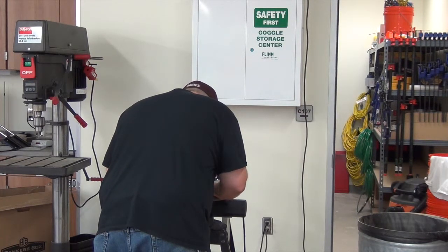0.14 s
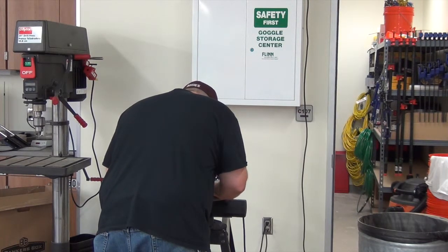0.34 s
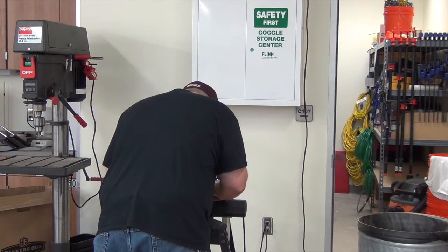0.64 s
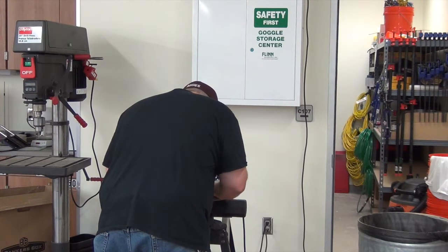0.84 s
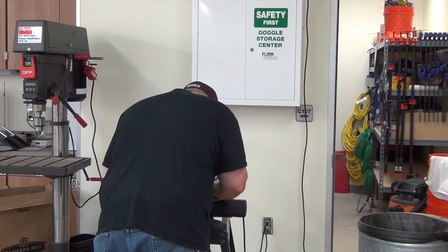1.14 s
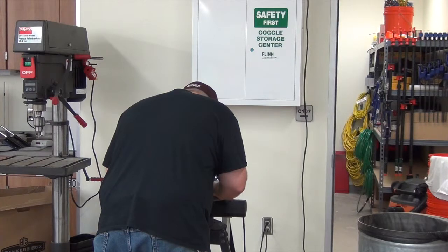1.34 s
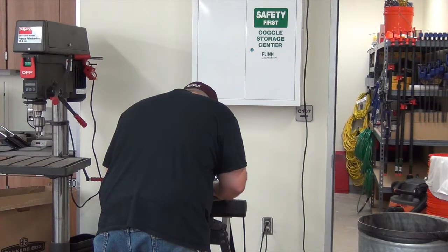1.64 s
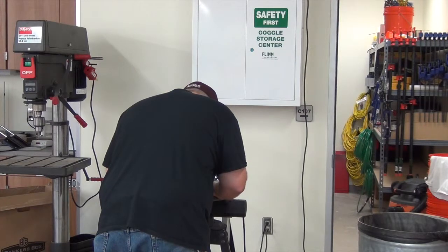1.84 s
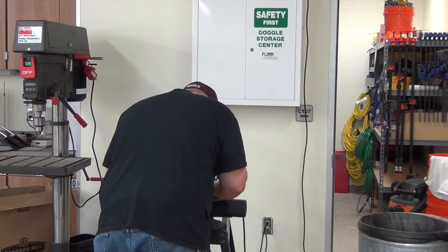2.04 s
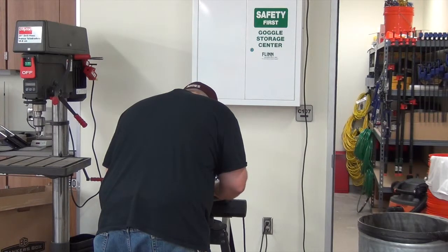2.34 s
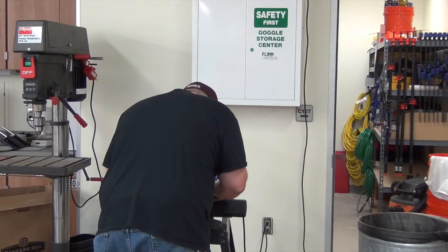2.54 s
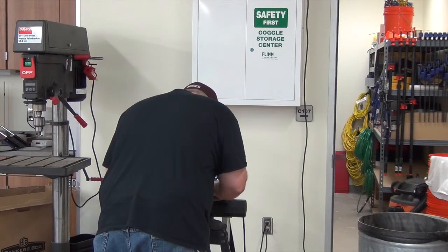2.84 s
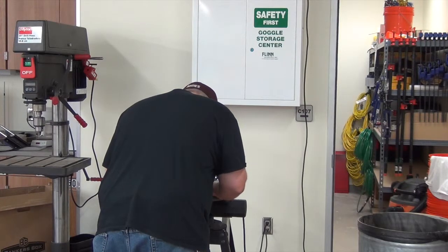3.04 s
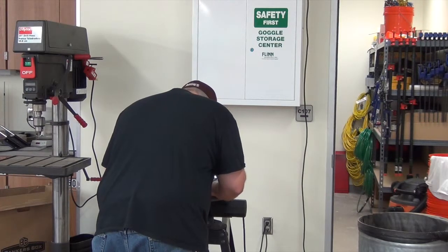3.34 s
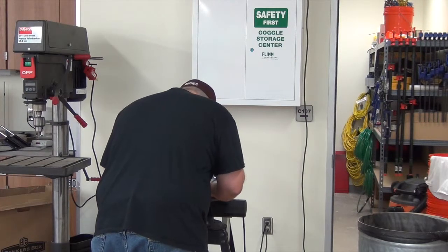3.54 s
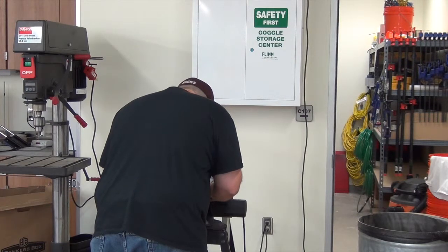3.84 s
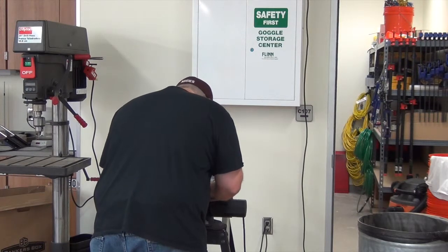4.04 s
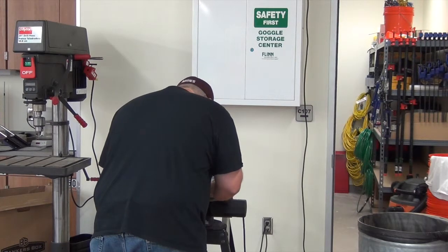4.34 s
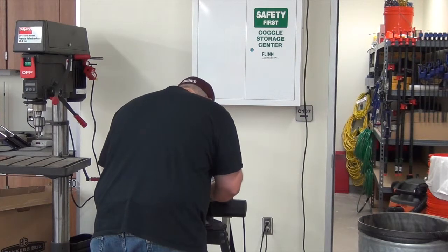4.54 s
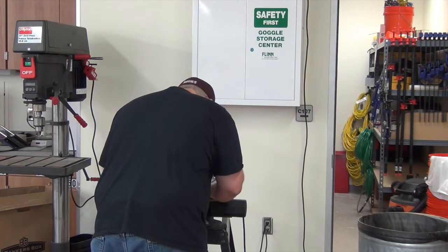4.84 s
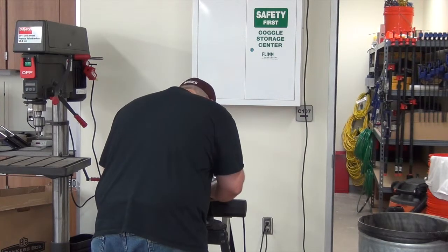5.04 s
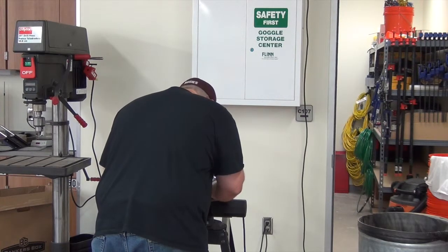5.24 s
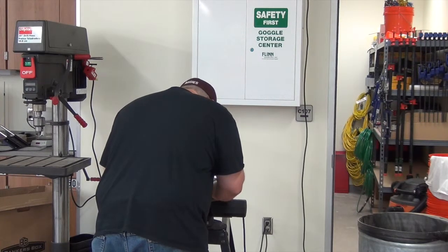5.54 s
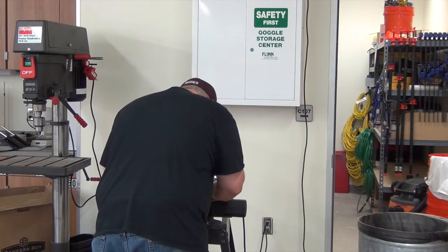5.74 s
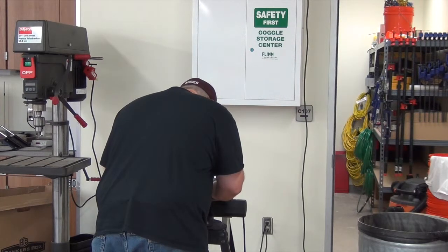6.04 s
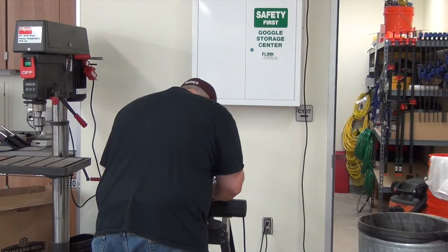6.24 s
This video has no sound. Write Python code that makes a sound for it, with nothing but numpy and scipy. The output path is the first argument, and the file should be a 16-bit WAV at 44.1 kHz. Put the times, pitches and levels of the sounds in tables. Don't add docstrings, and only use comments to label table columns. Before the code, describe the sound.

Rapid saw strokes, about twenty-four a second, tear at a wooden board with gritty rasping, high chirps and binding squeaks. The board slips and slaps the metal table in short, hollow bursts. Cutting softens, then stops, leaving steady motor hum and frame buzz. Finally the blade bites in again, rasping and shrieking louder. The room adds short, dense reflections; the nearly central stereo pickup is a few metres away, thin in deep bass and strained at the peaks.

```python
import sys
import numpy as np
from scipy import signal
from scipy.fft import rfft, irfft
from scipy.io import wavfile

SR = 44100
rng = np.random.default_rng(int(sys.argv[2]) if len(sys.argv) > 2 else 0)


def volts(x):
    e = np.asarray(x, float) / 20
    return 10 ** e


def output_pcm(signal):
    pcm = np.clip(np.atleast_2d(signal).T, -1, 1) * 32767
    wavfile.write(sys.argv[1], SR, np.round(pcm).astype(np.int16))


N = 281358
STROKE_HZ, MAINS_HUM_HZ = 24.15, 120


def rms_one(x):
    return x / np.sqrt(np.mean(x ** 2) + 1e-20)


def coloured(x, points):
    hz, db = np.transpose(points)
    bins = np.fft.rfftfreq(x.shape[-1], 1 / SR) + 1
    gain = volts(np.interp(np.log(bins), np.log(hz), db))
    return irfft(rfft(x) * gain, x.shape[-1])


def resonance(x, hz, width_hz):
    r = np.exp(-np.pi * max(width_hz, 4) / SR)
    top = (1 - r * r) / 2 * np.array([1, 0, -1])
    return signal.lfilter(top, [1, -2 * r * np.cos(2 * np.pi * hz / SR), r * r], x)


def band(x, low_hz, high_hz):
    return signal.sosfilt(signal.butter(4, [low_hz, high_hz], "band", fs=SR, output="sos"), x)


def drift(rate_hz):
    steps = rng.standard_normal(int(N / SR * 40) + 2)
    r = np.exp(-2 * np.pi * rate_hz / 40)
    slow = rms_one(signal.lfilter([1], [1, -r], steps))
    return np.interp(np.arange(N) / SR * 40, np.arange(len(slow)), slow)


def shop(x):
    t60_s, echo_db, side_db, wall_cut_hz = .35, -14, -29, 2500
    t = np.arange(int(.6 * SR)) / SR
    echoes = rng.standard_normal((2, len(t))) * volts(-60 * t / t60_s) * (t > .004)
    echoes[0] = signal.lfilter(*signal.butter(1, wall_cut_hz, fs=SR), echoes[0])
    echoes[1] = signal.lfilter(*signal.butter(1, 3 * wall_cut_hz, fs=SR), echoes[1])
    echoes /= np.sqrt(np.sum(echoes ** 2, axis=1, keepdims=True))
    mid, side = signal.fftconvolve(x[None], echoes, axes=1)[:, :N]
    mid = x + volts(echo_db) * mid
    return mid + volts(side_db) * side * [[1], [-1]]


# (time_s, lead_strokes)
CRANK_LEAD = [(0, -.17), (.5, -.17), (1.2, -.02), (2, -.07), (3, .02), (4.2, 0), (5.2, -.15), (6.38, -.08)]


def crank():
    t = np.arange(N) / SR
    return STROKE_HZ * t + np.interp(t, *np.transpose(CRANK_LEAD))


def bite(turns, depth_db, sharp):
    angle = 2 * np.pi * turns
    push = (.5 + .5 * np.cos(angle - .6 * np.cos(angle))) ** sharp
    return volts(-depth_db) + push


# (time_s, level_db)
MOTOR_LOAD = [(0, -48), (3.1, -48), (3.45, -51), (4.2, -51.5), (4.45, -50), (5.3, -52), (5.6, -48),
              (6.38, -47)]
# (order_strokes, level_db)
ORDER_SWELL = [(1, -56), (3, -49), (5, -22.5), (8, -33), (12, -26.5), (17, -10), (33, -10.5), (42, -11)]
# (order_strokes, level_db)
STRONG_ORDERS = [(9, -16), (10, -3), (14, -10), (15, -4), (18, -1), (20, -5), (21, -3), (24, -6), (25, 0),
                 (29, -7), (32, -7), (36, 0), (39, -7)]


def motor_tones(turns):
    t = np.arange(N) / SR
    tones = 0
    strong = dict(STRONG_ORDERS)
    for order in range(1, 43):
        level_db = strong.get(order, np.interp(order, *np.transpose(ORDER_SWELL)))
        on_mains = order % 5 == 0
        cycles = order / 5 * MAINS_HUM_HZ * t if on_mains else order * turns
        wobble = (.03 if on_mains else .9) * drift(2.5)
        unsteady_db = (.6 if on_mains else 3.5) * drift(3)
        level_db = level_db + 2.0 * on_mains - 0.4 + unsteady_db
        tones += volts(level_db) * np.sin(2 * np.pi * (cycles + rng.random()) + wobble)
    return volts(np.interp(t, *np.transpose(MOTOR_LOAD))) * tones


# (pitch_hz, level_db per Hz)
FRAME_NOISE = [(35, -60), (60, -27), (183, -9.5), (231, -5), (285, -2.5), (423, -17), (848, -10.5),
               (1120, -2.5), (1550, 0.5), (2980, -17), (3580, -19.5), (15500, -52)]
# (pitch_hz, width_hz, level_db)
FRAME_MODES = [(1430, 19, -6), (2050, 22, 2), (3620, 140, -14), (4160, 84, -13.5), (4900, 53, -20.5),
               (5650, 41, -33), (7400, 93, -31.5)]


def frame_rattle(turns):
    t = np.arange(N) / SR
    buzz = 1 + 0.18 * np.cos(2 * np.pi * MAINS_HUM_HZ * t)
    shaking = rng.standard_normal((2, N)) * buzz * bite(turns, -6.0, 6.7)
    rattle = coloured(shaking[0], FRAME_NOISE)
    for hz, width_hz, db in FRAME_MODES:
        rattle += volts(db - 1.0) * resonance(shaking[1], hz, width_hz)
    tick_strength = volts(4.7 * rng.standard_normal(200))[np.round(turns).astype(int)]
    tick = rng.standard_normal(N) * bite(turns, 30, 2.8) * tick_strength
    tick = resonance(resonance(tick, 9600, 1300), 9600, 1800)
    load = volts(np.interp(t, *np.transpose(MOTOR_LOAD)))
    return load * (volts(4.0) * rms_one(rattle) + volts(-25.5) * rms_one(tick))


def every_stroke(spells, turns, early, spread_db, pitch_spread):
    times_s = np.flatnonzero(np.diff(np.floor(turns + early))) / SR
    luck = np.clip(rng.standard_normal((len(times_s), 3)), -2, 2)
    rows = []
    for start, end, first_db, last_db, hz in spells:
        for at, (late, loud, high) in zip(times_s, luck):
            if start < at < end:
                level_db = np.interp(at, [start, end], [first_db, last_db]) + spread_db * loud
                rows.append((at + .003 * late, level_db, hz * (1 + pitch_spread * high)))
    return rows


def whistles(rows, length_s, gain_db, spread):
    out = np.zeros(N)
    t = np.arange(int(length_s * SR)) / SR
    swell = np.sin(np.pi * (t / length_s) ** 0.48)
    for (s, peak_db, hz), (slide, low, high) in zip(rows, rng.standard_normal((len(rows), 3))):
        cycles = hz * t * (1 + 0.27 * slide * t)
        tone = np.sin(2 * np.pi * cycles)
        for side in (low, high):
            tone += 0.49 * np.sin(2 * np.pi * cycles * (1 + spread * side))
        at = max(round((s - .002) * SR), 0)
        out[at:at + len(t)] += volts(peak_db + gain_db) * (tone * swell)[:N - at]
    return out


# (start_s, end_s, first_db, last_db, pitch_hz)
CHIRP_SPELLS = [
    (0, .47, -22, -28.5, 10600),
    (.5, 1.4, -57, -35, 10300),
    (1.47, 1.76, -31, -30, 10700),
    (1.84, 2.3, -29, -34, 10500),
]


def blade_chirps(turns):
    rows = every_stroke(CHIRP_SPELLS, turns, .1, spread_db=5.5, pitch_spread=0.037)
    return whistles(rows, 0.017, -10.5, 0.08)


# (time_s, peak_db, pitch_hz)
SQUEAKS = [(.5791, -10, 3930), (.616, -8.5, 4000), (.6589, -6, 3980), (.765, -9, 3710), (.7891, -4.5, 2760),
           (.829, -15, 2940), (.8714, -9, 2870), (.8714, -8.5, 3940), (.9058, -12.5, 3480),
           (.9477, -9, 2620), (1.1922, -13, 3980), (1.3249, -17, 2870), (1.8577, -20, 4100),
           (1.9, -21, 4000), (2.025, -21.5, 3990), (2.2313, -16.5, 3990), (3.1278, -21, 2870)]
# (start_s, end_s, first_db, last_db, pitch_hz)
SQUEAK_SPELLS = [
    (.07, .56, -10, -27, 3400),
    (5.33, 5.76, -27, -21, 3440),
    (5.9, 6.38, -11, -1.5, 3400),
]


def blade_squeaks(turns):
    rows = SQUEAKS + every_stroke(SQUEAK_SPELLS, turns, .17, spread_db=1.8, pitch_spread=.02)
    return whistles(rows, .016, -10, .03)


# (time_s, peak_db, pitch_hz)
KNOCKS = [(.5403, -9, 1720), (.5773, -11, 1730), (.622, -9.5, 1754), (.6603, -2.5, 1730),
          (.7087, -20, 1550), (.7866, -13, 1590), (.868, -6, 1730), (.9499, -4.5, 1476),
          (1.2794, -11, 1550)]
# (start_s, end_s, first_db, last_db, pitch_hz)
KNOCK_SPELL = [
    (.1, .39, -2, -6.5, 1720),
]


def table_knocks(turns):
    rows = KNOCKS + every_stroke(KNOCK_SPELL, turns, 0.27, spread_db=0.0, pitch_spread=0.015)
    return whistles(rows, .018, -6, .047)


SLAP_GAP_S = .0403


def bounce_db(slap):
    off = slap - 2.5
    return -np.where(off < 0, 1.9, 1.5) * off ** 2


# (start_s, peak_db, count_slaps, added_slack_db)
BOUTS = [
    (.618, -5.5, 6, 10.5),
    (.907, -2, 6, 15),
    (1.237, -2.5, 6, 10.5),
    (2.396, -23.5, 4.1, 0),
    (2.894, -28, 4.4, 1.5),
    (5.8, -18, 4.5, -1),
]
# (pitch_hz, level_db, t60_s)
BOARD = [(704, -13, .08), (797, -16, .07), (849, 0, .078), (897, -2, .072), (945, -14, .06)]


def board_chatter():
    t = np.arange(int(.2 * SR)) / SR
    contact = 1 - np.exp(-(t / .005) ** 2)
    in_step = t - .0105
    out = np.zeros(N)
    slaps = []
    for s, peak_db, count, _ in BOUTS:
        slaps += [(s + k * SLAP_GAP_S, peak_db + bounce_db(k)) for k in range(round(count))]
    for (s, peak_db), luck in zip(slaps, rng.standard_normal((len(slaps), 2, len(BOARD)))):
        ring = 0
        for (hz, db, t60_s), loud, phase in zip(BOARD, *luck):
            decay = volts(db + 1.3 * loud - 60 * t / t60_s)
            ring = ring + decay * np.sin(2 * np.pi * hz * in_step + phase * db / 7)
        ring = contact * ring
        at = round((s - .003) * SR)
        out[at:at + len(t)] += volts(peak_db + 3.0) * ring / np.abs(ring).max()
    return out


def tear(turns, depth_db, sharp):
    since = (turns + 0.17) % 1
    return volts(-depth_db) + np.minimum(since / 0.042, 1) * np.exp(-sharp * since)


def flecks(turns, count, spread_db):
    out, t = np.zeros(len(turns) + 2000), np.arange(int(0.027 * SR)) / SR
    shape = np.sin(np.pi * (t / t[-1]) ** 0.26)
    for start in np.flatnonzero(np.diff(np.floor(turns + 0.17))):
        late, pitch, size = rng.random((3, count))
        starts = start + (late ** 2 * 0.015 * SR).astype(int)
        for at, hz, db in zip(starts, 3400 * 4.4 ** pitch ** .8, np.log(size + .05)):
            out[at:at + len(t)] += volts(-spread_db * db) * hz * shape * np.sin(2 * np.pi * hz * t)
    return rms_one(out[:len(turns)])


def teeth_and_ringing(turns, modes, grit, depth_db, grit_db, squeak_db, fleck_db, sharp):
    size, stroke = len(turns), np.round(turns).astype(int)
    tears = volts(2.0 * np.minimum(rng.exponential(1, size), 5)) * rng.standard_normal(size)
    tears = rms_one(tears) * volts(rng.standard_normal(200))[stroke]
    tearing = rms_one(tears * tear(turns, depth_db, sharp))
    tearing = tearing + volts(fleck_db) * flecks(turns, count=10, spread_db=1.0)
    sound = volts(grit_db) * coloured(tearing, grit)
    for hz, width_hz, db in modes:
        caught = volts(squeak_db * rng.standard_normal(200))[stroke]
        pressure = bite(turns + rng.normal(0, 0.1), depth_db + 3.4 * np.log2(hz / 2000), 0.36)
        drive = rms_one(rng.standard_normal(size) * caught * pressure)
        sound += volts(db) * resonance(drive, hz, width_hz + hz / 100)
    return sound


# (low_hz, high_hz)
BANDS_HZ = [(350, 1020), (1020, 1900), (1900, 5400), (5400, 15600)]
FOLLOWS_FEED = [0.67, 0.86, 1.0, .9]
BLADE_DULLS_S = (2.33, 2.4, 5.45, 5.7)
BLADE_DULLS_DB = (-0.5, -3.5, -1.5, 1)


def cut(rows, mix_db, board_share, modes, grit, turns, **teeth):
    middle_db = -25
    s, feed_db, slack_db = np.transpose(rows)
    first, last = max(int(s[0] * SR), 0), min(int(s[-1] * SR), N)
    sound = teeth_and_ringing(turns[first:last], modes, grit, **teeth)
    t = np.arange(first, last) / SR
    from_start = t - s[0] + (s[0] == 0)
    to_end = s[-1] - t + (last >= N - 99)
    ends = np.clip(np.minimum(from_start, to_end) / .02, 0, 1)
    feed, slack = np.interp(t, s, feed_db) - middle_db, np.interp(t, s, slack_db)
    for start, _, _, added_db in BOUTS:
        slack += np.maximum(added_db + bounce_db((t - start) / SLAP_GAP_S), 0)
    out = np.zeros(N)
    shakes = [board_share, 1, 0, 0]
    for (low, high), over_db, follows, share in zip(BANDS_HZ, mix_db, FOLLOWS_FEED, shakes):
        level_db = middle_db + over_db + follows * feed + share * slack
        if low > 5000:
            level_db = level_db + np.interp(t, BLADE_DULLS_S, BLADE_DULLS_DB)
        out[first:last] += ends * volts(level_db) * rms_one(band(sound, low, high))
    return out


# (time_s, feed_db, slack_db)
HEAVY = [
    (0, -12.5, -1),
    (.04, -19, 2),
    (.2, -20, 5),
    (.44, -24, -1.5),
    (.53, -24.5, -1),
    (.62, -26, 0.5),
]
HEAVY_MIX = [-0.5, 4, 1.5, -10]
# (pitch_hz, width_hz, level_db)
HEAVY_MODES = [(794, 193, -4.5), (1202, 30, 0.5), (1720, 18, -2.5), (2620, 15, -13.5), (2870, 120, -23),
               (3180, 25, -19), (3570, 38, -14), (3980, 70, -17.5), (5100, 290, -31), (4920, 22, -22)]
# (pitch_hz, level_db per Hz)
HEAVY_GRIT = [(180, -64), (300, -22), (372, -2.5), (535, -26), (863, 6.5), (1000, -29), (1180, 3.5),
              (1320, 4), (1750, 0.5), (1970, -10), (4960, -24.5), (15500, -56)]


def heavy_cut(turns):
    return cut(HEAVY, HEAVY_MIX, .3, HEAVY_MODES, HEAVY_GRIT, turns,
               depth_db=14, grit_db=-7, squeak_db=3.0, fleck_db=3, sharp=4.0)


# (time_s, feed_db, slack_db)
LOOSE = [
    (.6, -27.5, 0),
    (.8, -25.5, 0),
    (1.2, -27.5, 0.0075),
    (1.44, -27.5, 0),
    (1.55, -43, 0),
]
LOOSE_MIX = [0, -3, -2, -10.5]
# (pitch_hz, width_hz, level_db)
LOOSE_MODES = [(1178, 44, -4.5), (1450, 136, -3.5), (1550, 15, -17), (1730, 60, -6.5), (2270, 42, -6.5),
               (2620, 15, -7), (2730, 220, -9.5), (3340, 150, -9.5), (3820, 31, -12), (3980, 21, -7),
               (4540, 120, -21)]
# (pitch_hz, level_db per Hz)
LOOSE_GRIT = [(180, -53), (300, -21), (372, -15.5), (877, 4), (1020, -22), (1700, -8.5), (3750, -18),
              (4070, -16), (15500, -53)]


def loose_cut(turns):
    return cut(LOOSE, LOOSE_MIX, .55, LOOSE_MODES, LOOSE_GRIT, turns,
               depth_db=3, grit_db=-6, squeak_db=3.5, fleck_db=-4, sharp=3.5)


# (time_s, feed_db, slack_db)
LIGHT = [
    (1.45, -31.5, 2.5),
    (2.1, -34, -0.5),
    (2.5, -33.5, 2),
    (2.7, -35.5, -0.5),
    (3.16, -34.5, 2),
    (3.31, -47, 1),
    (3.45, -49, 2),
    (3.5, -57, 2.5),
    (3.6, -63, 1),
]
LIGHT_MIX = [-4.5, -1, 0.5, -8.5]
# (pitch_hz, width_hz, level_db)
LIGHT_MODES = [(692, 60, -8), (1228, 72, 4.5), (1414, 39, 3.5), (1720, 5.7, 4.5), (2280, 47, -5.5),
               (2870, 160, -10), (3324, 8.9, -8.5), (3440, 14, -13), (3990, 39, -15), (4900, 180, -22.5)]
# (pitch_hz, level_db per Hz)
LIGHT_GRIT = [(180, -48), (300, -8), (348, -6), (543, -12), (860, 5.5), (1000, -11), (1440, 15), (1940, -7),
              (4070, -7.5), (5300, -22.5), (6900, -16.5), (8270, -28.5), (10800, -30.5), (15500, -44)]


def light_cut(turns):
    return cut(LIGHT, LIGHT_MIX, 0.4, LIGHT_MODES, LIGHT_GRIT, turns,
               depth_db=0, grit_db=-7.0, squeak_db=2.5, fleck_db=-7.0, sharp=2.2)


# (time_s, feed_db, slack_db)
ENTRY = [
    (5.335, -33, -15),
    (5.345, -19, -21),
    (5.372, -32, -10),
    (5.387, -24, -13),
    (5.477, -21, 4.5),
    (5.6, -19.5, 0),
    (5.76, -19, -2.5),
    (5.84, -16.5, -14),
]
ENTRY_MIX = [-10.5, 0.5, -0.5, -8]
# (pitch_hz, width_hz, level_db)
ENTRY_MODES = [(880, 54, -21), (1214, 14, 3), (1410, 31, -5), (1760, 21, -8), (2010, 82, -4), (2282, 42, 1),
               (2870, 110, -5.5), (3400, 44, -8.5), (3520, 12, -1.5), (3930, 27, -12), (4400, 34, -8.5),
               (4600, 44, -26), (4850, 42, -12.5)]
# (pitch_hz, level_db per Hz)
NEXT_GRIT = [(180, -58), (300, -18), (863, -11), (1030, -14), (1370, 7.5), (1870, -17.5), (2320, 3.5),
             (3180, -12), (3450, -5), (5480, -24.5), (7490, -20.5), (15500, -40.5)]


def entry_cut(turns):
    return cut(ENTRY, ENTRY_MIX, 0.21, ENTRY_MODES, NEXT_GRIT, turns,
               depth_db=3.0, grit_db=-6.0, squeak_db=-1.1, fleck_db=-6.0, sharp=5.1)


# (time_s, feed_db, slack_db)
NEXT = [
    (5.82, -16.5, -8),
    (5.89, -17, 1.5),
    (6.02, -13.5, -4.5),
    (6.19, -12, 0),
    (6.3, -14.5, 0.5),
    (6.38, -14, -2.5),
]
NEXT_MIX = [-7.5, 1.5, 0.5, -10]
# (pitch_hz, width_hz, level_db)
NEXT_MODES = [(882, 66, -3), (1426, 87, 6), (1730, 72, -3), (1985, 21, 0), (2190, 51, -2), (2540, 34, -3),
              (2870, 27, 1), (3405, 26, -5), (3800, 40, -17), (4360, 7.7, -4.5), (4590, 30, -8),
              (4990, 18, -13), (4800, 13, -26), (7170, 330, -16.5)]


def next_cut(turns):
    return cut(NEXT, NEXT_MIX, 1.2, NEXT_MODES, NEXT_GRIT, turns,
               depth_db=1.0, grit_db=-2.5, squeak_db=0.0, fleck_db=-14, sharp=3.1)


# (pitch_hz, level_db over the right)
LEFT_OVER_RIGHT = [(60, 4), (250, 2), (800, 2.3), (1500, 1.1), (5000, .6), (15000, .1)]


def scene():
    turns = crank()
    tones = motor_tones(turns)
    saw = frame_rattle(turns)
    saw += blade_chirps(turns) + blade_squeaks(turns) + table_knocks(turns)
    saw += board_chatter()
    saw += heavy_cut(turns) + loose_cut(turns) + light_cut(turns)
    saw += entry_cut(turns) + next_cut(turns)
    left, right = volts(-2.0) * shop(saw) + tones
    return np.array([coloured(left, [(hz, db / 2) for hz, db in LEFT_OVER_RIGHT]),
                     coloured(right, [(hz, -db / 2) for hz, db in LEFT_OVER_RIGHT])])


def low_pass(x):
    return signal.sosfilt(signal.butter(12, 15640, fs=SR, output="sos"), x)


def record(dry):
    bass_cut = signal.butter(1, 70, "high", fs=SR, output="sos")
    top_cut = signal.cheby2(16, 60, 15950, fs=SR, output="sos")
    overloaded = np.clip(signal.sosfilt(bass_cut, dry), -1, 1)
    return low_pass(signal.sosfilt(top_cut, overloaded))


dry = scene()
out = record(dry)
output_pcm(out)
```